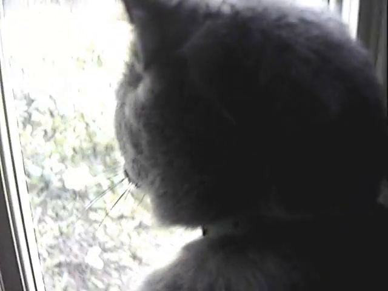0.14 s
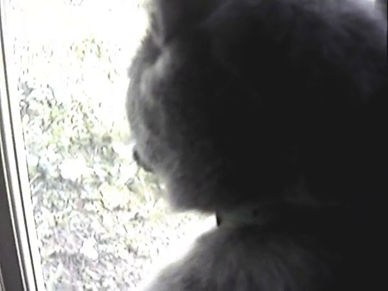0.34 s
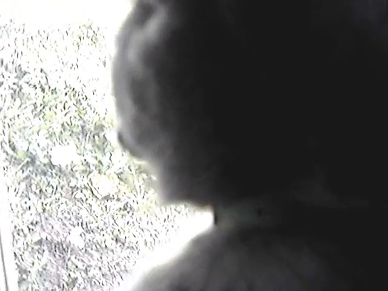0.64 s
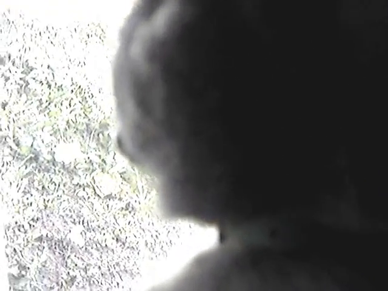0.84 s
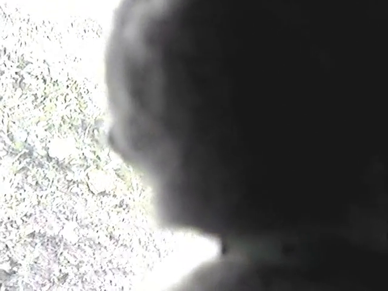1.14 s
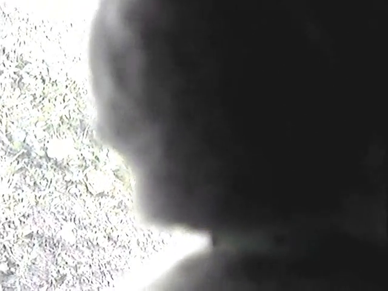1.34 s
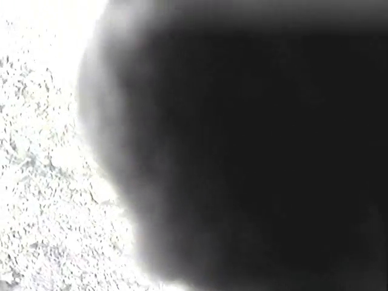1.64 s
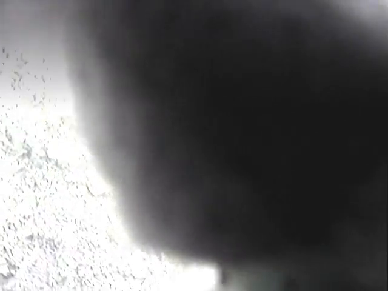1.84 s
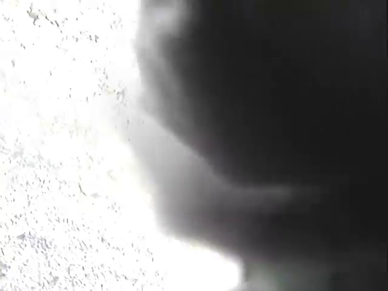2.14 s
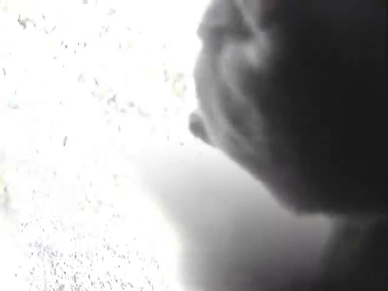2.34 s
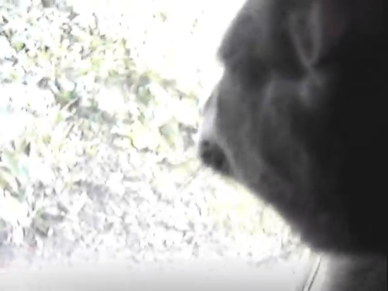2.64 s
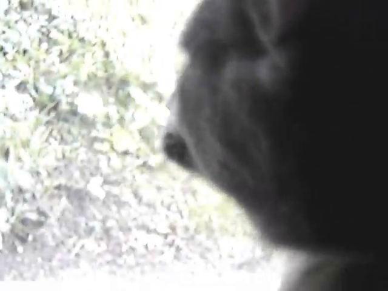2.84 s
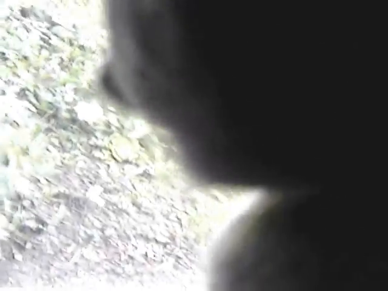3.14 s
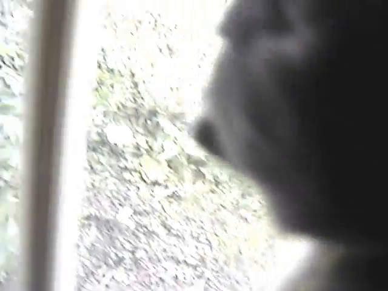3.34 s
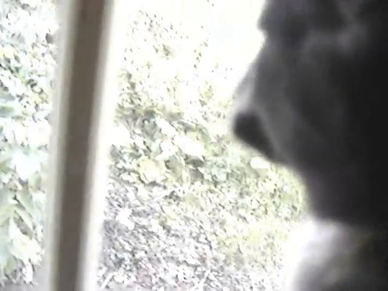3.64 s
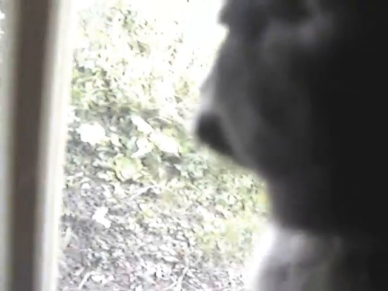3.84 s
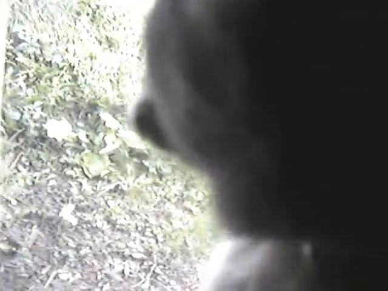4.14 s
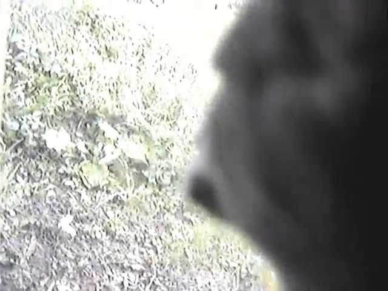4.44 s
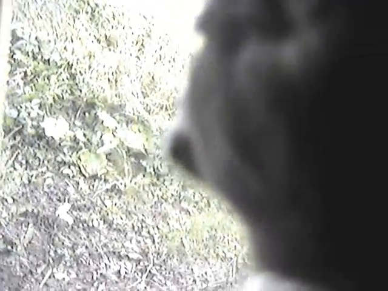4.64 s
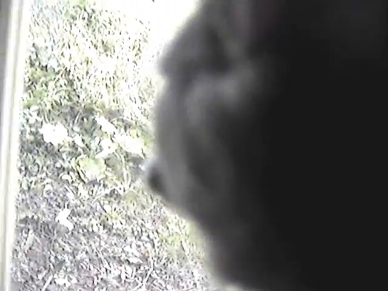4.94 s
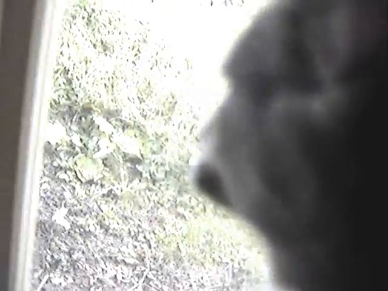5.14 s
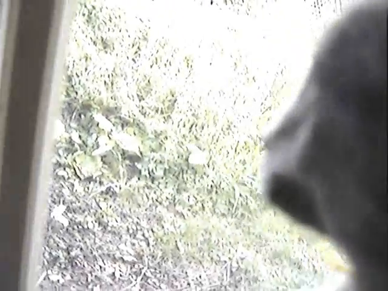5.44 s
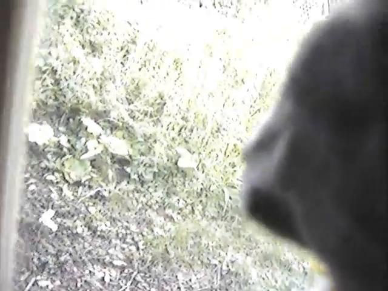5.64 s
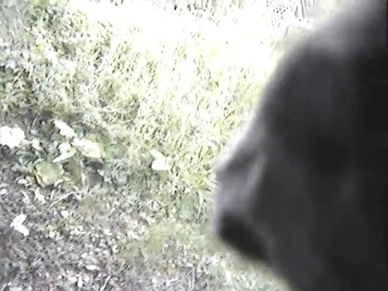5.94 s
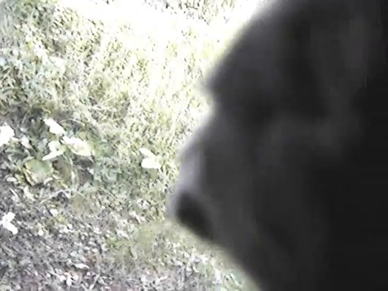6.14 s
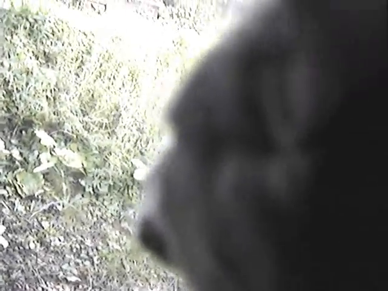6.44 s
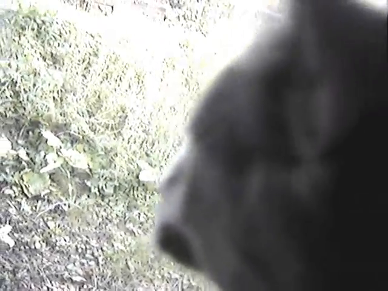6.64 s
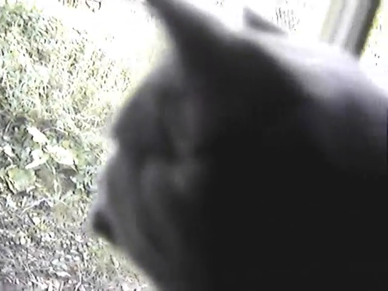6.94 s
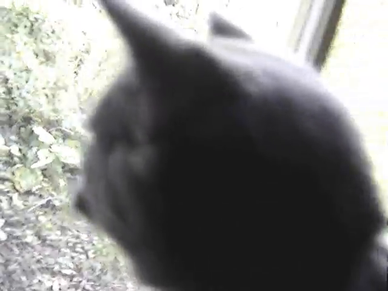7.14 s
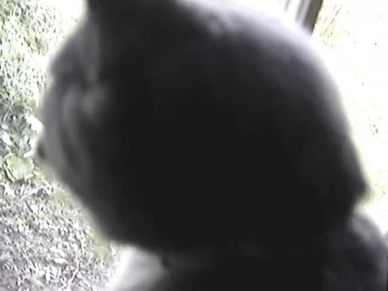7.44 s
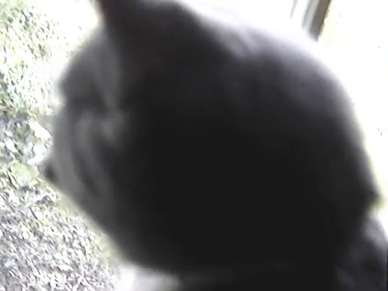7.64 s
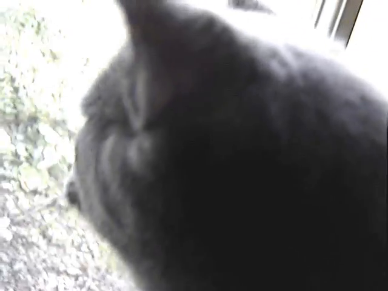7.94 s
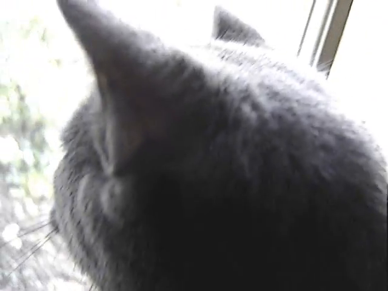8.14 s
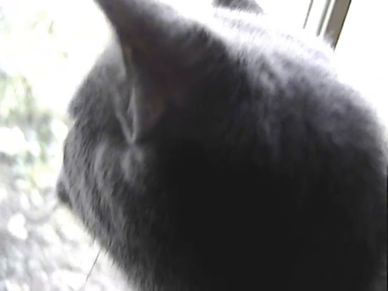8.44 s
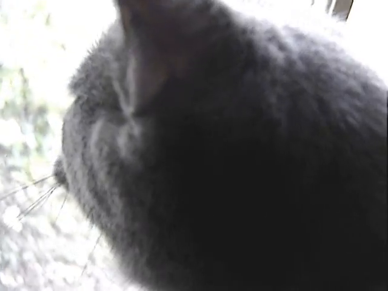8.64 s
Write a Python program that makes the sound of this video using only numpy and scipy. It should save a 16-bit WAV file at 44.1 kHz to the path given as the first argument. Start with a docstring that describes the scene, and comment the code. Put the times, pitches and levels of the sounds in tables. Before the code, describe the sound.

Close hand-held camera rustles, creaks and knocks beside a cat at a window, with dry clicks, faint bird trills and a low distant engine drone.

```python
"""Quiet room by a window, a cat close beside a hand-held camera; from the start fur strokes hiss as shaped noise.
Grip creaks set the case ringing from 0.6 s; bumps thud, clack and ring a tiny spring, hardest near 6 s.
Dry chirps, squeaks, clicks and a scuff, grainy noise bursts, come from 0.9 to 2.8 s and at 8 s.
A faint bird trills as a swept whistle from 1.5 s; a distant engine, two gliding sines, is strongest near 6.4 s.
Hum, rumble, rub noise and a thin camera whine lie underneath throughout."""
import sys
import numpy as np
from scipy import signal
from scipy.fft import rfft, irfft, next_fast_len
from scipy.io import wavfile
from scipy.ndimage import uniform_filter1d

SR = 44100
rng = np.random.default_rng(int(sys.argv[2]) if len(sys.argv) > 2 else 0)


def unload_audio(sound):
    """Save the sound as a 16-bit wav file, at the path given as the first command line argument."""
    columns = np.transpose(np.atleast_2d(sound))
    # keep every value between -1 and 1, then stretch to whole-number steps
    steps = np.round(np.clip(columns, -1, 1) * 32767)
    wavfile.write(sys.argv[1], SR, steps.astype(np.int16))


N = 388028
TIME = np.arange(N) / SR             # seconds through the scene
AGE = np.arange(int(.3 * SR)) / SR   # seconds since a short sound began

# Distant engine, levels before the room lifts them: start_s, firing_rate_hz, level_db
ENGINE_GLIDE = [(2.4, 87.8, -57), (2.85, 94, -49), (3.45, 100, -47.5), (4.1, 105.4, -45),
                (4.35, 110.7, -55), (4.9, 123, -50), (5.5, 119.5, -49), (5.82, 117.6, -41.5),
                (6.41, 123.1, -38.5), (7.2, 130, -50), (7.55, 125.2, -45), (7.8, 115.1, -55.5),
                (8.1, 117.8, -43), (8.8, 117, -62)]
# Standing waves of the room, where the drone swells: pitch_hz
ROOM_MODES_HZ = (94, 100, 105.4, 117.6, 124.4, 129.9)
# Thin steady tones of the camera: pitch_hz, level_db (rms)
CAMERA_WHINE = [(2000, -79), (4000, -83.5), (6001, -77.5), (7000, -83), (8010, -76.5), (8041, -87),
                (15001, -90)]
# Low rumble of the house, spectrum: pitch_hz, relative_level_db
RUMBLE_SPECTRUM = [(15, 13), (30, -3), (60, 7), (90, -13), (160, 11), (400, -32)]
# Faint bird outside, levels before pulsing: centre_s, level_db, pitch_hz, half_length_s
BIRD_TRILLS = [(1.45, -62, 2480, 0.07), (3.816, -60, 2420, .05), (5.974, -52.5, 2460, 0.04),
               (7.681, -57.5, 2780, .045), (8.036, -56, 2670, .025), (8.187, -61, 2640, 0.045)]
# Steady handling, levels before trims: start_s, rustle_level_db, hiss_level_db
STEADY_HANDLING = [(0.0, -53.5, -58), (0.29, -55, -55.5), (0.61, -52.5, -55.5), (1.81, -53, -60),
                   (2.03, -54.5, -61.5), (2.28, -55, -61), (2.89, -52.5, -58), (3.77, -53, -57),
                   (3.99, -53, -58), (4.85, -52.5, -58), (5.46, -55, -58), (6.0, -54, -59),
                   (6.91, -54.5, -59), (7.18, -53.5, -58.5), (7.74, -55.5, -58.5), (8.8, -54, -58.5)]
# Fur across the camera, levels before trims: height_s, swell_s, rustle_level_db, swish_level_db
FUR_STROKES = [(0.10, 0.036, -58, -55.5), (0.27, 0.016, -54, -62), (0.605, 0.038, -56, -53.5),
               (0.90, .08, -66, -59), (1.30, 0.041, -57, -71), (1.52, 0.0052, -43.5, -63),
               (1.845, 0.012, -58, -58), (4.32, 0.039, -49, -60), (4.735, 0.029, -48, -57.5),
               (5.88, 0.011, -59, -55), (5.985, 0.034, -48, -60), (6.57, 0.023, -47, -66),
               (8.525, 0.019, -54, -52)]
# Spectra of low rub, rustle, swish and stick-slip scratch: pitch_hz, relative_level_db
RUB_SPECTRUM = [(50, -7), (90, 1.5), (150, -9.5), (230, 1.5), (300, -6), (400, -2.5), (520, -10),
                (800, -23)]
RUSTLE_SPECTRUM = [(400, -8), (620, 1), (760, 2), (940, 2), (1100, -3), (1700, -6), (2500, -7.5),
                   (3500, -11), (6000, -26)]
SWISH_SPECTRUM = [(1500, -14), (3000, -4.5), (4500, -0.5), (7000, -3), (9800, -5), (10200, -19),
                  (16000, -16)]
SCRATCH_SPECTRUM = [(600, 5), (930, 5), (1100, -6.5), (1400, 7), (1800, -8.5), (2500, -2.5), (4000, -18),
                    (9000, -26)]
# Clear creaks of the grip, size of each slip: start_s, level_db
GRIP_CREAKS = [(0.582, -37), (1.665, -40), (1.693, -37), (2.238, -37.5), (2.654, -40.5), (3.033, -39.5),
               (3.100, -39), (3.166, -38.5), (3.267, -38.5), (3.300, -36.5), (3.379, -38.5), (3.865, -39.5),
               (4.305, -46.5), (4.46, -43), (4.729, -45), (4.868, -45), (5.04, -42), (7.366, -44),
               (8.719, -36.5)]
# Resonances of the case: pitch_hz, relative_level_db, t60_s
CASE_MODES = [(87, -12, 0.39), (116.8, 4, 0.13), (160, -3.5, 0.13), (190, -33, 0.025), (233, 8.5, 0.062),
              (281, 5.5, 0.058), (360, 7, 0.22), (395, -0.5, 0.16), (626, -8.5, 0.043), (736, -2, 0.021),
              (839, -5, 0.029), (941, -7, 0.078), (1073, -6, 0.054), (1280, 0, 0.021)]
# Edges of the case's boom, thud and clack ranges: pitch_hz
CASE_EDGES_HZ = (0, 175, 500, 1600)
# Tiny spring in the case: pitch_hz, relative_level_db, t60_s
SPRING_MODES = [(11855, 0, .12), (12325, 0, .12), (13140, -10, .08)]
# Skin slipping on plastic, spectrum: pitch_hz, relative_level_db
SKIN_SPECTRUM = [(1150, 10.5), (1450, 3.5), (1800, 1), (2200, 1.5), (2620, 6.5), (3000, -1), (6000, -7),
                 (9500, -7), (10800, -15), (16000, -18)]
# Bumps on the case, part levels before the bass cut:
# start_s, thud_level_db, thud_pitch_hz, boom_level_db, clack_level_db, tick_level_db
CASE_BUMPS = [(0.084, -26.5, 233, -40, -47, -59), (0.094, -27.5, 216, -21.5, -48, -53),
              (0.808, -43, 283, -56, -55, -63), (0.918, -27, 259, -52, -44, -49),
              (0.930, -25.5, 230, -38.5, -44, -66), (0.950, -39.5, 299, -55, -54, -70),
              (1.065, -41, 248, -72, -51, -60), (1.246, -37.5, 213, -37, -51, -70),
              (1.259, -42.5, 382, -47, -47, -65), (1.32, -42, 393, -40, -47, -65),
              (1.361, -40, 220, -40, -58, -66), (1.574, -42, 216, -45, -50, -65),
              (1.830, -31.5, 190, -48, -41.5, -61), (1.896, -42, 203, -35, -46, -63),
              (1.917, -32, 198, -46.5, -41, -53), (1.992, -46.5, 400, -60, -49.5, -71),
              (2.049, -37, 390, -39.5, -48, -59), (2.381, -43, 231, -36, -55, -66),
              (2.547, -38, 206, -35.5, -45, -55), (2.776, -39.5, 360, -42, -44, -49.5),
              (3.156, -45, 329.4, -50, -53, -70), (3.331, -32.5, 217, -39, -49, -59),
              (4.073, -41.5, 360, -50.5, -46, -65), (4.612, -38, 253, -58, -49, -53),
              (4.648, -38.5, 247, -46, -44, -58), (4.783, -39.5, 350, -35.5, -43, -69),
              (4.795, -39, 235, -32, -57, -69), (4.924, -42, 337, -51, -46.5, -54),
              (4.972, -37.5, 255, -37, -44.5, -52), (5.128, -41, 219, -63, -44.5, -47.5),
              (5.175, -40.5, 230, -42, -62, -53), (5.27, -24, 212, -29.5, -40.5, -44.5),
              (5.536, -39, 210, -37.5, -42.5, -52), (5.836, -35.5, 227, -53, -46, -61),
              (5.872, -32, 248, -55, -48, -47.5), (6.017, -14.5, 222, -24, -28.5, -39.5),
              (6.553, -37, 250, -62, -47.5, -48), (6.581, -40, 264, -41, -55, -59),
              (7.89, -41, 224, -56, -54, -73), (8.453, -42.5, 299.5, -60, -60, -68),
              (8.498, -25.5, 262.4, -57, -48, -54), (8.62, -40.5, 238, -50, -57, -60)]
# Dry chirps, squeaks, clicks and a scuff, some of them within bumps:
# peak_s, level_db, centre_hz, width_hz, swell_s, decay_s
DRY_CLICKS = [(0.921, -45, 2480, 600, 0.0042, 0.0031), (0.922, -46, 1260, 300, 0.0026, .005),
              (1.323, -56, 1190, 400, .003, 0.0055), (1.5185, -46, 4120, 4950, 0.00099, 0.0028),
              (1.519, -45, 1120, 1500, 0.0074, 0.0023), (1.710, -51.5, 4100, 2000, .0006, 0.0027),
              (1.748, -55, 7600, 2592, 0.00092, 0.0019), (1.8935, -41, 3620, 1389, 0.0034, 0.0036),
              (1.894, -49.5, 5400, 3500, 0.0038, 0.0023), (2.776, -43.5, 1340, 900, 0.0011, 0.0094),
              (8.013, -50, 6870, 4030, .0005, 0.016)]


def from_db(db):
    """Decibels to gain."""
    return 10 ** (np.asarray(db) / 20)


def rms_one(x):
    """Scale to rms 1."""
    return x / np.sqrt(np.mean(x ** 2) + 1e-20)


def unit_blow(x):
    """Scale to the energy of 20 ms at rms 1."""
    return x / np.sqrt(np.sum(x ** 2) / (.02 * SR) + 1e-20)


def in_time(rows):
    """Draw one curve over time per column after the first."""
    s, *columns = np.transpose(rows)
    return [np.interp(TIME, s, column) for column in columns]


def noise():
    """White noise for the whole scene."""
    return rng.standard_normal(N)


def colour(x, points):
    """Give a sound the spectrum (Hz, dB), with steep ends; rms 1."""
    hz, db = np.transpose(points)
    size = next_fast_len(len(x))
    f = np.maximum(np.fft.rfftfreq(size, 1 / SR), 1)
    ends = 1 / np.sqrt((1 + (hz[0] / f) ** 6) * (1 + (f / hz[-1] / 2) ** 6))
    gain = ends * from_db(np.interp(np.log(f), np.log(hz), db))
    return rms_one(irfft(rfft(x, size) * gain, size)[:len(x)])


def drift(rate):
    """Smooth chance of rms 1, with `rate` random turning points a second."""
    knots = rng.standard_normal(8000)
    return rms_one(np.interp(TIME * rate, np.arange(len(knots)), knots))


def add(out, s, x):
    """Mix a short sound in at time s."""
    i = max(int(s * SR), 0)
    out[i:i + len(x)] += x[:max(N - i, 0)]


def engine(waver_db, second_db=-16, mode_width_hz=3.2):
    """Firing rate and its octave through the glass; standing waves of the room lift the drone as it passes."""
    hz, db = in_time(ENGINE_GLIDE)
    phase = 2 * np.pi * np.cumsum(hz) / SR
    off_hz = np.min([np.abs(hz - f) for f in ROOM_MODES_HZ], axis=0)
    lift = 1 / np.sqrt(1 + (2 * off_hz / mode_width_hz) ** 2)
    drone = np.sin(phase) + from_db(second_db) * np.sin(2 * phase)
    return lift * from_db(db + waver_db * drift(12)) * drone


def background(waver_db=0.75, hum_hz=118, hum_db=-55.5, rumble_db=-55.5):
    """Distant engine, wavering house hum, camera tones of unsteady phase and low rumble."""
    hum_level = from_db(hum_db + waver_db * drift(2.9))
    hum = hum_level * np.sin(2 * np.pi * hum_hz * TIME + 0.32 * drift(3.52))
    whine = sum(from_db(level) * np.sin(2 * np.pi * f * TIME + 0.85 * drift(14))
                for f, level in CAMERA_WHINE)
    tones = np.sqrt(2) * (engine(waver_db) + hum + whine)   # sine peaks for rms levels
    return tones + from_db(rumble_db) * colour(noise(), RUMBLE_SPECTRUM)


def room(x, t60_s=0.33, level_db=-8.5, wall_hz=600, bass_hz=130, build_s=0.005):
    """A dull, short tail of dense reflections, made of decaying noise."""
    t = np.arange(int(.6 * SR)) / SR
    tail = rng.standard_normal(len(t)) * from_db(-60 * t / t60_s) * (1 - np.exp(-(t / build_s) ** 2))
    tail = tail / np.sqrt(np.sum(tail ** 2))
    band = signal.butter(1, [bass_hz, wall_hz], "band", fs=SR, output="sos")
    return from_db(level_db) * signal.fftconvolve(x, signal.sosfilt(band, tail))[:N]


def bird(trill_hz=58, sweep=0.051, blur=0.054):
    """A buzzy whistle, pulsed and swept once per beat of the trill."""
    out, t = np.zeros(N), AGE - AGE.mean()
    for s, db, hz, half_s in BIRD_TRILLS:
        beat = 2 * np.pi * trill_hz * t
        buzz = rms_one(uniform_filter1d(rng.standard_normal(len(t)), size=90))
        pitch = hz * (1 + sweep * np.sin(beat) + blur * buzz)
        whistle = np.sin(2 * np.pi * np.cumsum(pitch) / SR)
        add(out, s + t[0], from_db(db) * np.exp(-(t / half_s) ** 2) * (1 + np.cos(beat)) * whistle)
    return out


def friction(rustle_db=0.0, swish_db=-3, release=0.88):
    """Rustle and swish levels in dB: steady handling, plus the power of each stroke as it swells and fades."""
    steady_rustle, steady_swish = in_time(STEADY_HANDLING)
    power = from_db([steady_rustle + rustle_db, steady_swish + swish_db]) ** 2
    for s, swell_s, *levels_db in FUR_STROKES:
        # release is the fading time as a share of the swell
        reach = np.abs(TIME - s) / np.where(TIME < s, swell_s, swell_s * release)
        swell = np.exp(-np.minimum(reach, 10) ** 2 / 2)
        power = power + np.outer(from_db(levels_db), swell) ** 2
    return 10 * np.log10(power)


def brushing(rustle, swish, rustle_db=-0.5, swish_db=2.0, rub_over_db=2.5, rub_follows=0.9,
             rub_rough_db=3.0, rustle_rough_db=1.38, swish_rough_db=1.0, drum_hz=60, drum_depth=0.15):
    """Friction catches and lets go unevenly; the camera's spinning drum flutters the rustle and hiss."""
    usual = np.median(rustle)
    rub = usual + rub_over_db + rub_follows * (rustle - usual)
    catch = drift(45)   # shared by rub and rustle
    rustle_catch = (catch + drift(120)) / np.sqrt(2)
    turn = 2 * np.pi * drum_hz * TIME
    flutter = 1 + drum_depth * (np.cos(turn) + 0.73 * np.cos(2 * turn))
    low = from_db(rub + rub_rough_db * catch) * colour(noise(), RUB_SPECTRUM)
    mid = from_db(rustle + rustle_db + rustle_rough_db * rustle_catch) * colour(noise(), RUSTLE_SPECTRUM)
    high = from_db(swish + swish_db + swish_rough_db * drift(150)) * colour(noise(), SWISH_SPECTRUM)
    return low + mid * flutter + high * np.sqrt(np.abs(flutter))


def ring(modes, build_cycles=0.5, stiffen=0., relax_s=0.013):
    """Decaying sines, each swinging up within a cycle; pressure can stiffen them, so they sag as it relaxes."""
    warped = AGE + stiffen * relax_s * (1 - np.exp(-AGE / relax_s))
    out = np.zeros(len(AGE))
    for hz, db, t60 in modes:
        swing_up = 1 - np.exp(-(AGE * hz / build_cycles) ** 2)
        out += from_db(db - 60 * AGE / t60) * swing_up * np.sin(2 * np.pi * hz * warped)
    return out


def push(hz, modes, cycles, ring_db, reach_octaves=0.48):
    """The contact bounces for a few cycles at its own pitch and wakes the case modes near that pitch."""
    turns = hz * AGE
    bounce = (turns / cycles) ** 2 * np.exp(-turns / cycles) * np.sin(2 * np.pi * turns)
    woken = ring([(f, db - 6 * (np.log2(f / hz) / reach_octaves) ** 2, t60) for f, db, t60 in modes])
    return unit_blow(unit_blow(bounce) + from_db(ring_db) * unit_blow(woken))


def skid(x, force_db, amount=.07, skid_s=0.0086, firm_db=-33):
    """A light touch skids and strikes many times over; a firm one sticks."""
    looseness = amount * from_db(-max(force_db - firm_db, 0))
    contact = (AGE == 0) + looseness * rng.standard_normal(len(AGE)) * np.exp(-AGE / skid_s)
    return unit_blow(signal.fftconvolve(x, contact)[:len(AGE)])


def crinkle(rustle, per_s=9, level_db=2, size_db=3.5, scratch_db=-2, decay_s=0.0024,
            creak_hz=895, creak_ring_db=-10.5):
    """The grip sticks and slips: clear creaks, and tiny random ones, more and stronger with harder rubbing."""
    chance = per_s * from_db(2 * (rustle - np.median(rustle))) / SR
    born = rng.random(N) < chance
    sizes = born * from_db(rustle + level_db + size_db * np.clip(noise(), -2, 2))
    for s, db in GRIP_CREAKS:
        add(sizes, s, from_db([db]))
    slips = signal.lfilter([1], [1, -np.exp(-1 / (decay_s * SR))], sizes + 1e-18)
    scratch = from_db(scratch_db) * slips * colour(noise(), SCRATCH_SPECTRUM)
    # each slip sets the case ringing near creak_hz
    case = push(creak_hz, CASE_MODES, cycles=1.0, ring_db=1, reach_octaves=0.47)
    return scratch + from_db(creak_ring_db) * signal.fftconvolve(sizes, case)[:N]


def knocks(grip_spread=0.02, strength_db=3.5, light_db=-36, press_s=0.001158, lead_s=0.001116,
           tick_s=0.004, tick_tail=0.13, tick_tail_s=0.026, grain_db=13.0, spring_db=-38,
           clack_pitch_hz=735, clack_at_db=-38.5, clack_octaves_per_db=.013):
    """Each bump is a push, a clack as it bottoms out and a brief slip; grip and touch point vary every ring."""
    out = np.zeros(N)
    mode_hz, mode_db, t60 = np.transpose(CASE_MODES)
    skin = colour(noise() * from_db(grain_db * noise()), SKIN_SPECTRUM)
    for s, thud_db, thud_hz, boom_db, clack_db, tick_db in CASE_BUMPS:
        grip, touch = rng.standard_normal((2, len(CASE_MODES)))
        struck = np.column_stack([mode_hz * (1 + grip_spread * grip), mode_db + strength_db * touch, t60])
        deep, middle, bright = [struck[(mode_hz >= low) & (mode_hz < high)]
                                for low, high in zip(CASE_EDGES_HZ, CASE_EDGES_HZ[1:])]
        # a heavy push sinks in for longer before it bottoms out
        sink_s = press_s * from_db(max(thud_db - light_db, 0) / 2)

        boom = unit_blow(ring(deep, stiffen=0.42))
        thud = push(thud_hz, middle, cycles=0.52, ring_db=-4)
        add(out, s - lead_s, from_db(boom_db) * boom + from_db(thud_db) * thud)

        fade = np.exp(-AGE / tick_s) + tick_tail * np.exp(-AGE / tick_tail_s)
        slip = (1 - np.exp(-AGE / sink_s)) * fade
        tick = unit_blow(np.roll(skin, -int(s * SR))[:len(AGE)] * slip)
        add(out, s - lead_s, from_db(tick_db) * tick)

        # a heavier bump clacks lower
        clack_hz = clack_pitch_hz * 2 ** (clack_octaves_per_db * (clack_at_db - thud_db))
        clack = skid(push(clack_hz, bright, cycles=0.37, ring_db=12.0), thud_db, amount=0.071)
        spring = from_db(thud_db + spring_db) * unit_blow(ring(SPRING_MODES))   # shaken by the thud
        add(out, s - lead_s + sink_s, from_db(clack_db) * clack + spring)
    return out


def dry_clicks(grain_db=11.5, lead_s=.03):
    """Chirps, squeaks, clicks and a scuff: grainy bursts through a steep resonance, gone in milliseconds."""
    out, t = np.zeros(N), AGE - lead_s
    for s, db, hz, width_hz, swell_s, decay_s in DRY_CLICKS:
        grains = rng.standard_normal(len(t)) * from_db(grain_db * rng.standard_normal(len(t)))
        burst = grains * np.exp(np.minimum(t / swell_s, -t / decay_s))
        r = np.exp(-np.pi * width_hz / SR)
        peak = [1, 0, -1, 1, -2 * r * np.cos(2 * np.pi * hz / SR), r * r]
        add(out, s - lead_s, from_db(db) * unit_blow(signal.sosfilt([peak, peak], burst)))
    return out


def scene(bump_bass_cut_hz=62):
    """Close bumps and dry clicks with their room, over the steady bed; the bumps carry no deep bass."""
    bass_cut = signal.butter(3, bump_bass_cut_hz, "high", fs=SR, output="sos")
    close = signal.sosfilt(bass_cut, knocks()) + dry_clicks()
    rustle, swish = friction()
    handling = brushing(rustle, swish) + crinkle(rustle)
    return (background() + bird() + handling + close + room(close))[None]


def record(dry, cutoff_hz=15900):
    """The microphone loses the deepest bass; the top is cut steeply."""
    x = signal.sosfilt(signal.butter(1, 20, "high", fs=SR, output="sos"), dry)
    return signal.sosfilt(signal.ellip(12, .1, 80, cutoff_hz, fs=SR, output="sos"), x)


dry = scene()
out = record(dry)
unload_audio(out)
```